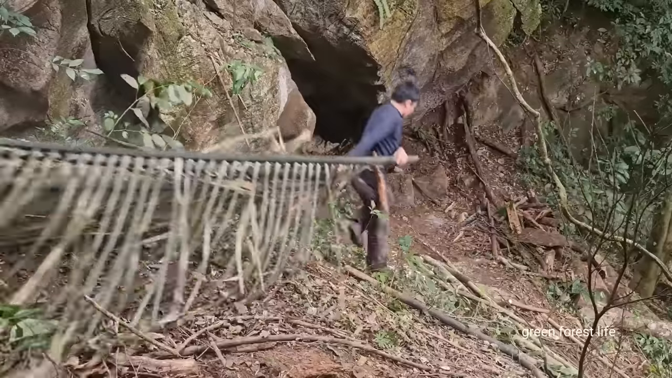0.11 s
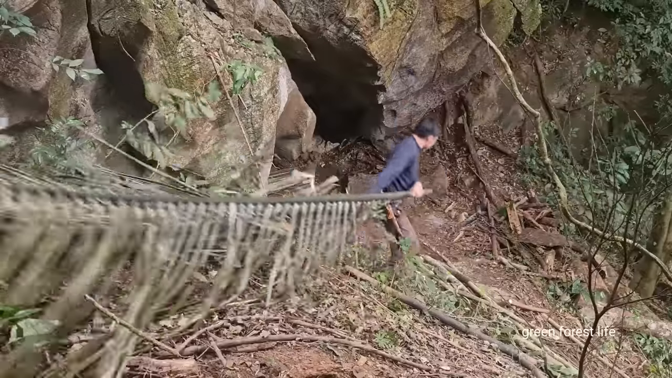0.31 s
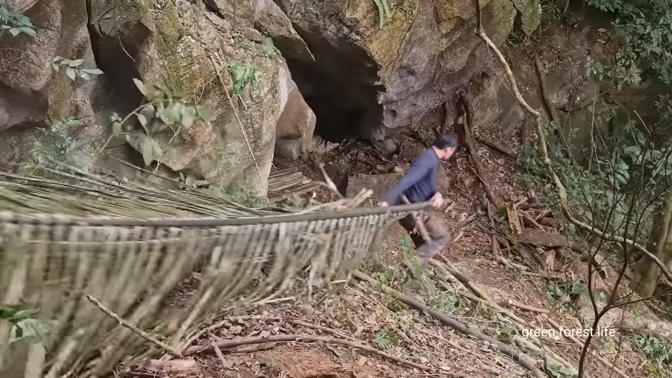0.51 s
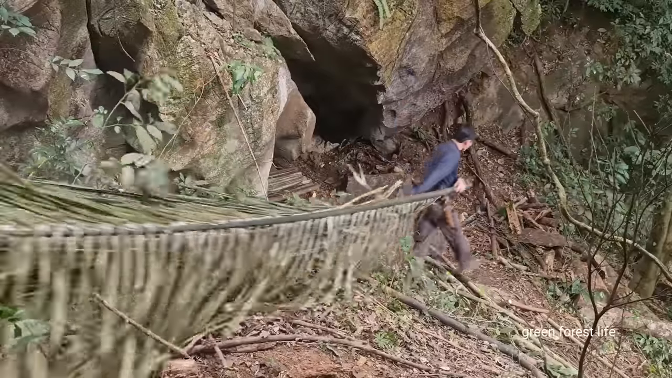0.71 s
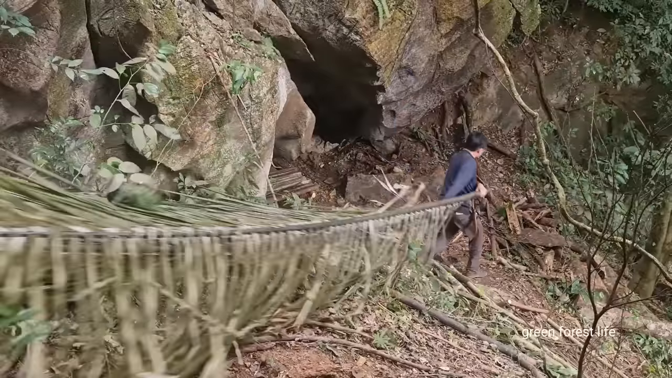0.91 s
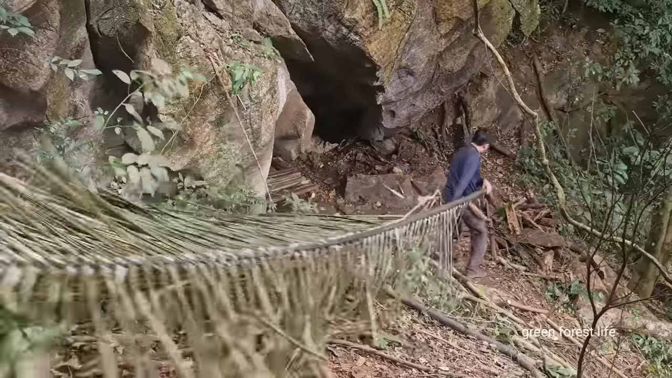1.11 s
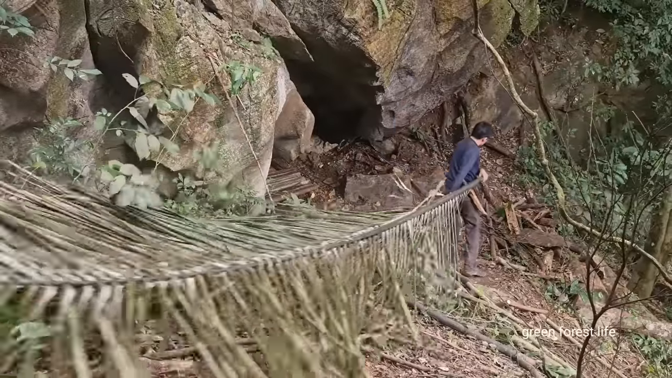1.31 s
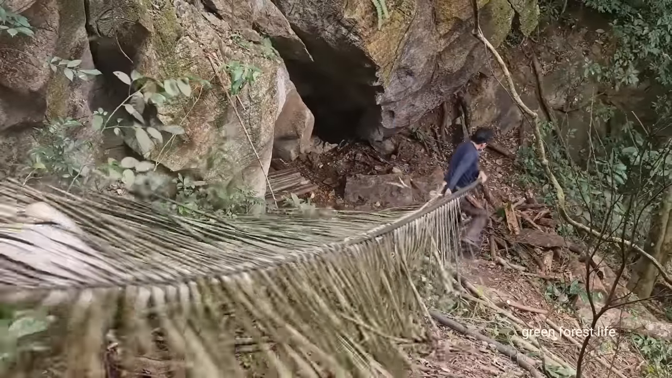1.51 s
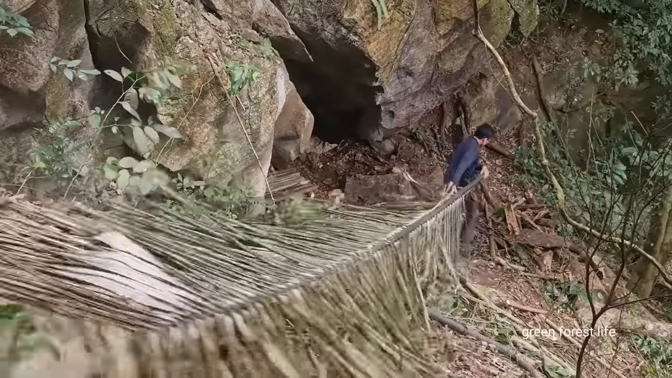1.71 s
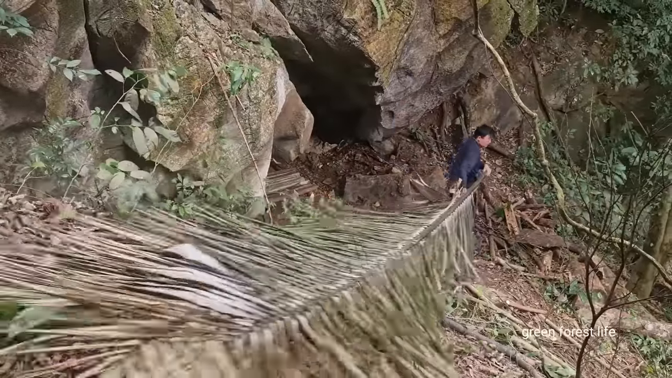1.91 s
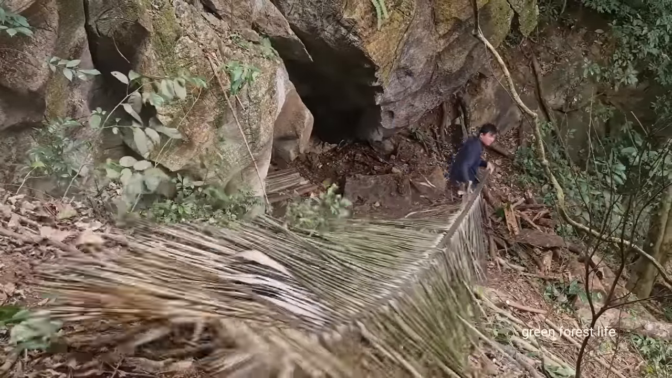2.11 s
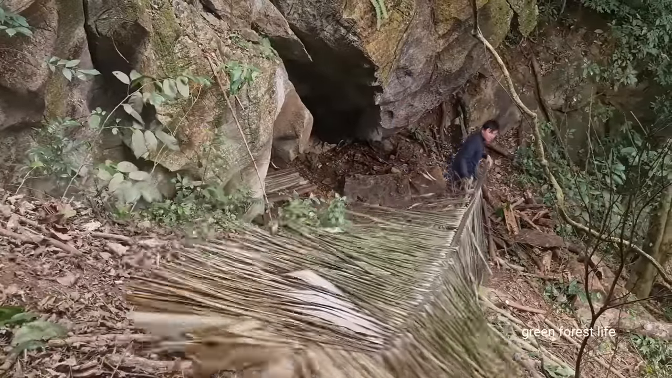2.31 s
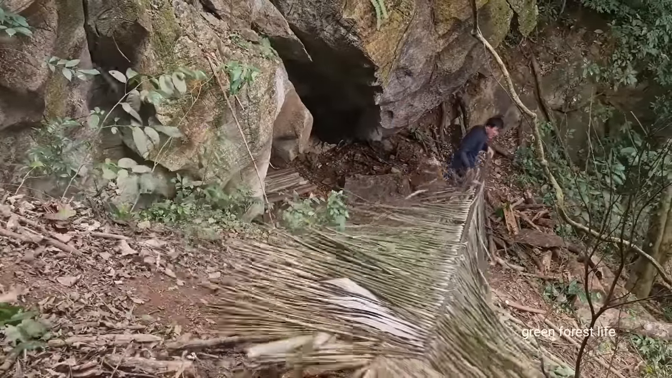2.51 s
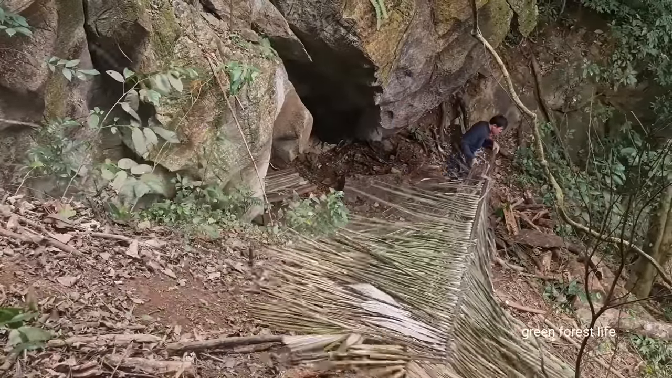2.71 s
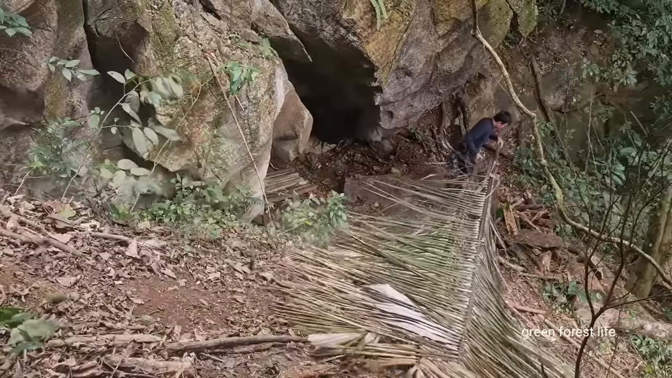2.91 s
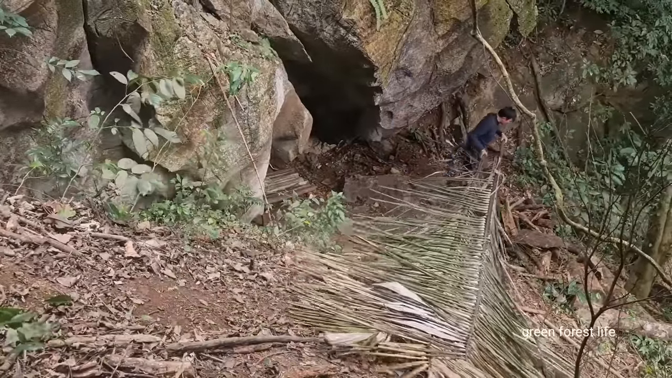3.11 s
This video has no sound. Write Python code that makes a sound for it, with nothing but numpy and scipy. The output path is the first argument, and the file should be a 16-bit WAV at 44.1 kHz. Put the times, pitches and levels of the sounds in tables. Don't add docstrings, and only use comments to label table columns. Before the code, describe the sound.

A long leafy frond is yanked and dragged over dry forest litter; a dense, crackling rustle bursts up close on the left, then recedes toward the centre while twigs snap and the stem softly thuds.

```python
import sys
import numpy as np
from scipy import signal
from scipy.fft import rfft, irfft
from scipy.io import wavfile
from scipy.ndimage import uniform_filter1d, map_coordinates

SR = 44100
rng = np.random.default_rng(int(sys.argv[2]) if len(sys.argv) > 2 else 0)


def generate_wav(sig):
    pcm = np.round(np.clip(np.atleast_2d(sig).T, -1, 1) * 32767).astype(np.int16)
    wavfile.write(sys.argv[1], SR, pcm)


def makeup_ratio(level_db):
    decades = np.asarray(level_db, float) / 20
    return 10 ** decades


N = 145530
T = np.arange(N) / SR
HZ = np.maximum(np.arange(N // 2 + 1) * SR / N, 1)

# start_s [s], level_db [dB], brightness [dB per octave], left_minus_right_db [dB]
DRAG_PULL = [(0, -44, 1, 2), (.1, -50, -0.5, -3.5), (.182, -54.5, -1, -1), (.2, -32, 0, 0.5),
             (.27, -25, 0, 2), (.47, -20.5, -.5, 1.5), (.6, -22, 0, 1), (.75, -21.5, 0, 1),
             (.9, -24, -.5, 1.5), (1.2, -25, 0, 0.5), (1.35, -26.5, 0, .5), (1.65, -26.5, 0, 0.5),
             (2.0, -28, 0, -1), (2.3, -29, .5, -1.5), (2.55, -31, .5, -2.5), (2.7, -33, 0, -2),
             (2.9, -35, .5, -2.5), (3.3, -40, -0.5, -2)]
# start_s [s], left_lead_ms [ms], likeness of both ports [0-1]
FROND_BEARING = [
    (0, .05, .5),
    (.19, .5, .9),
    (1.0, .48, .87),
    (1.6, .33, .8),
    (2.0, .17, .7),
    (2.4, -.05, .68),
    (2.8, -.15, .66),
    (3.3, -.17, .68),
]


def curve(table, column):
    rows = np.array(table)
    return np.interp(T, rows[:, 0], rows[:, column])


def walk(rate_hz):
    hold = int(SR / rate_hz)
    steps = np.repeat(rng.standard_normal(N // hold + 1), hold)
    smooth = uniform_filter1d(uniform_filter1d(steps, hold), hold)[:N]
    return (smooth - smooth.mean()) / smooth.std()


def band(x, hz):
    octaves_off = np.clip(np.log2(HZ / hz), -.5, .5)
    return irfft(rfft(x) * np.cos(np.pi * octaves_off), N)


def ports(x):
    half_lead = curve(FROND_BEARING, column=1) * SR / 2000
    left, right = [map_coordinates(x, [np.arange(N) + side * half_lead], order=3, mode="mirror")
                   for side in (1, -1)]
    return np.array([left, right])


def microphone_hiss():
    return makeup_ratio(-66) * np.diff(rng.standard_normal((2, N + 1)))


def stem_bumps():
    # start_s [s], peak_db [dB], pitch_hz [Hz]
    thuds = [
        (.27, -47, 55),
        (0.418, -39, 95),
        (.47, -52, 65),
        (0.931, -39, 108),
        (.96, -41, 65),
        (1.27, -48, 91.5),
        (1.78, -46, 103),
        (2.992, -37.5, 270),
        (2.991, -49.5, 120),
        (3.08, -57, 60),
    ]
    rise_cycles, left_minus_right_db = 1.9, 1.5
    out = np.zeros(N)
    for start_s, peak_db, pitch_hz in thuds:
        u = np.clip((T - start_s) * pitch_hz / rise_cycles, 0, None)
        swell_and_fall = np.e * 2 * u * np.exp(-2 * u)
        out += makeup_ratio(peak_db) * swell_and_fall * np.sin(2 * np.pi * pitch_hz * (T - start_s))
    return out * makeup_ratio(np.array([[left_minus_right_db], [-left_minus_right_db]]) / 2)


def twig_snaps():
    # start_s [s], peak_db [dB], ring_hz [Hz], ring_t60_s [s], crack_db [dB re ring]
    snap_table = [(0.1713, -42, 5530, 0.0095, -3), (0.4733, -16, 2970, .008, 8),
                  (0.5103, -12.5, 3730, .008, 1), (1.6315, -11.5, 5800, .009, 1.5),
                  (1.6575, -22, 6700, .008, 0), (1.7358, -16.5, 2680, .012, -3),
                  (2.127, -22, 1480, 0.0081, -5), (2.5097, -25, 2370, .01, -1),
                  (2.635, -7.5, 1610, 0.0073, -15), (2.8445, -25, 2450, 0.0046, -3),
                  (2.9789, -25.5, 1090, 0.011, 1), (3.002, -20.5, 2160, .03, -2),
                  (3.069, -24, 2170, 0.042, -11), (3.073, -26, 1350, 0.031, -5),
                  (3.1598, -30, 1700, 0.0087, 1), (3.212, -28.5, 6800, .008, -7)]
    rise_cycles, crack_t60_s = 1.8, 0.0072
    debris_db, debris_t60_s = -10, 0.085
    t = np.arange(4000) / SR
    out = np.zeros((2, N + len(t)))
    lead = curve(FROND_BEARING, column=1) * SR / 1000
    pan_db = curve(DRAG_PULL, column=3)

    def fall(t60_s, late_s=0):
        return makeup_ratio(-60 * np.maximum(t - late_s, 0) / max(t60_s, .002))

    for start_s, peak_db, ring_hz, ring_t60_s, crack_db in snap_table:
        noise = rng.standard_normal((3, len(t)))
        rise_s = rise_cycles / ring_hz
        ring = np.sin(2 * np.pi * ring_hz * t) * fall(ring_t60_s, rise_s) * np.minimum(t / rise_s, 1)
        crack_filter = signal.butter(2, [ring_hz / 3, min(ring_hz * 3, 14000)], "band", fs=SR)
        crack = signal.lfilter(*crack_filter, noise[0] * fall(crack_t60_s, rise_s))
        debris = signal.lfilter(*signal.iirpeak(ring_hz, 1.5, SR), noise[1:])
        debris = debris * fall(debris_t60_s) * makeup_ratio(debris_db)
        for ear, side in enumerate((1, -1)):
            i = int(start_s * SR - side * lead[int(start_s * SR)] / 2)
            snap = ring + makeup_ratio(crack_db) * crack + debris[ear]
            out[ear, i:i + len(t)] += makeup_ratio(peak_db + side * pan_db[i] / 2) * snap
    return out[:, :N]


def frond_rustle():
    # pitch_hz [Hz], level_db [dB per Hz]
    leaf_colour = [(25, -32), (65, -13.5), (200, -7.5), (450, -2.5), (1400, 4.5), (6000, 0.5), (8500, -4.5),
                   (13500, -9)]
    # start_s [s], boost_db [dB], centre_hz [Hz], length_s [s]
    crunches = [(0.08, 4, 5000, 0.014), (.32, 2.5, 4500, 0.11), (0.51, 1.5, 3000, 0.069),
                (1.27, 4, 4970, 0.027), (1.733, 4.5, 1800, .025), (1.915, 3.5, 2950, 0.037),
                (2.087, 1.5, 2020, .05), (2.268, 2, 1980, 0.052), (2.498, 1.5, 2000, 0.025),
                (2.647, 4.5, 2000, 0.029), (2.99, 3, 1200, .04), (3.07, 2, 1800, 0.0093)]
    crunch_octaves = 1.07
    crackles_per_s, crackle_db, crackle_t60_s = 900, -9.5, 0.0042
    crackle_spread_db, crackle_cap_db, crackle_octaves = 2.5, 9.5, 1.38
    swell_db, patch_db, flicker_db, bass_lurch_db = .25, .45, 0.7, -1
    alike_hz, ground_hz = 1900, 260
    yank_s, before_dip_hz, before_dip_db = .185, 434, -11
    near_body_hz, near_body_octaves, near_body_db_per_ms = 630, 0.39, 9.5

    count = int(crackles_per_s * N / SR)
    when, strength, sign, height = rng.random((count, 4)).T
    at = (when * N).astype(int)
    size_db = np.minimum(-crackle_spread_db * np.log(strength), crackle_cap_db)
    size = makeup_ratio(size_db) * np.sign(sign - .5)
    pitch = np.log2(300) + 5.54 * height

    lead_ms = curve(FROND_BEARING, column=1)
    like = np.clip(curve(FROND_BEARING, column=2), 0, 1)
    tilt = curve(DRAG_PULL, column=2)
    colour_hz, colour_db = np.array(leaf_colour).T
    swell, patch = walk(12), walk(14)
    own_sum, shared_sum = np.zeros((2, N)), np.zeros(N)
    for hz in 25 * 2 ** np.arange(0, 9.6, .5):
        nearness = np.exp(-.5 * ((pitch - np.log2(hz)) / crackle_octaves) ** 2)
        clicks = np.bincount(at, size * nearness, N)
        smear = signal.lfilter([1], [1, -makeup_ratio(-60 / crackle_t60_s / SR)], np.abs(clicks))
        crackle = smear * rng.standard_normal(N) * makeup_ratio(crackle_db) / smear.std()

        share = (1 - (1 - like) / (1 + (ground_hz / hz) ** 2)) / (1 + (hz / alike_hz) ** 4)
        shared = band(np.sqrt(share) * rng.standard_normal(N) + crackle, hz)
        own = np.sqrt(1 - share) * band(rng.standard_normal((2, N)), hz)

        patch = .8 * patch + .6 * walk(14)
        db = swell_db * swell + patch_db * patch + flicker_db * walk(35.13)
        db = db + bass_lurch_db * walk(16) / (1 + (hz / 150) ** 2)
        db = db + tilt * np.log2(hz / 4000) + np.interp(np.log(hz), np.log(colour_hz), colour_db)
        for start_s, boost_db, centre_hz, length_s in crunches:
            time_off = (T - start_s) / length_s * 2
            pitch_off = np.log2(hz / centre_hz) / crunch_octaves
            db = db + boost_db * np.exp(-.5 * time_off ** 2 - .5 * pitch_off ** 2)
        body = np.exp(-.5 * (np.log2(hz / near_body_hz) / near_body_octaves) ** 2)
        db = db + near_body_db_per_ms * (lead_ms - .15) * body
        db = db + before_dip_db * (T < yank_s) * np.exp(-5 * np.log2(hz / before_dip_hz) ** 2)
        own_sum = own_sum + makeup_ratio(db) * own
        shared_sum = shared_sum + makeup_ratio(db) * shared
    pan_db = curve(DRAG_PULL, column=3)
    pull_db = curve(DRAG_PULL, column=1) + 4.5
    return (own_sum + ports(shared_sum)) * makeup_ratio(pull_db + np.array([pan_db, -pan_db]) / 2)


def scene():
    return microphone_hiss() + stem_bumps() + twig_snaps() + frond_rustle()


def low_pass(x):
    return signal.sosfilt(signal.butter(12, 16730, fs=SR, output="sos"), x)


def record(dry):
    # centre_hz [Hz], width_hz [Hz], level_db [dB]
    left_port = [(754, 210, 2.5), (1044, 270, -3.5), (1930, 1020, -3), (3060, 1600, 1.5),
                 (10230, 1100, -3.5), (12380, 3100, 3)]
    right_port = [(820, 67, 2.5), (1026, 180, -7.5), (1560, 1200, 1.5), (2040, 840, -1.5),
                  (7040, 1800, 4.5), (7970, 1230, -9), (12000, 1400, 3)]
    # centre_hz [Hz], width_hz [Hz], level_db [dB]
    roll_off = (15200, 2800, -2)
    # centre_hz [Hz], width [octaves], turn [radians]
    port_turns = [(420, .55, .8), (1450, .4, -.85)]
    top_db = -90 * np.clip((HZ - 15600) / 200, 0, 1)
    gains = []
    for port in (left_port, right_port):
        port_db = top_db
        for hz, width_hz, db in list(port) + [roll_off]:
            port_db = port_db + db * np.exp(-.5 * ((HZ - hz) / width_hz * 2) ** 2)
        gains.append(makeup_ratio(port_db))
    turn = sum(rad * np.exp(-.5 * (np.log2(HZ / hz) / octaves) ** 2) for hz, octaves, rad in port_turns)
    phase = np.exp(.5j * np.outer([1, -1], turn))
    mix = irfft(rfft(np.tanh(dry)) * np.array(gains) * phase, N)
    return low_pass(mix)


dry = scene()
out = record(dry)
generate_wav(out)
```